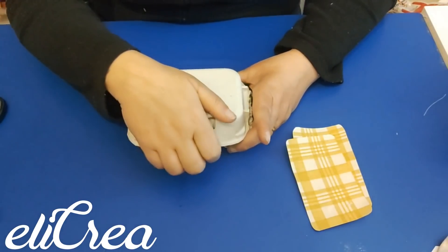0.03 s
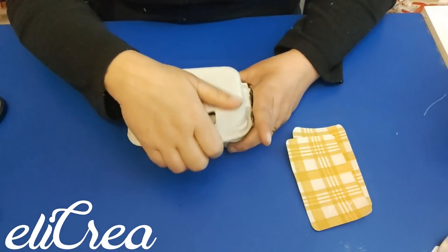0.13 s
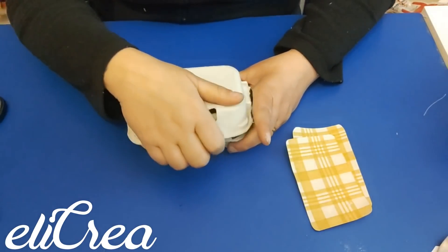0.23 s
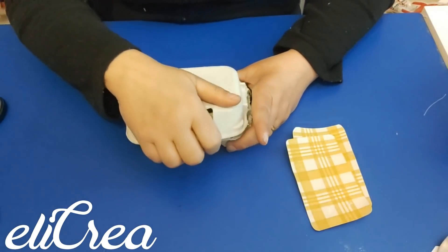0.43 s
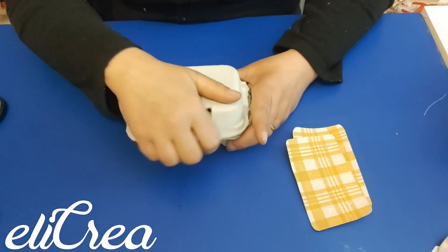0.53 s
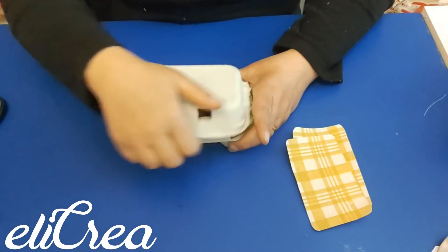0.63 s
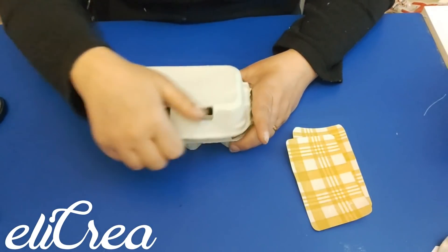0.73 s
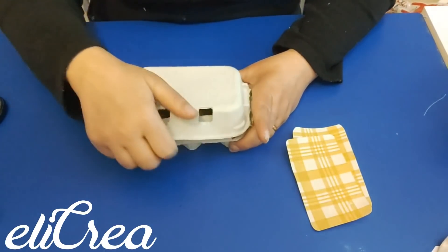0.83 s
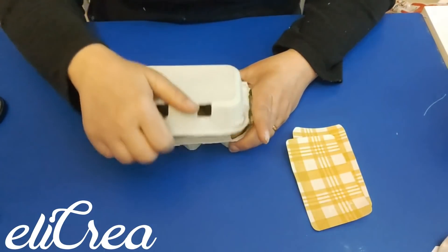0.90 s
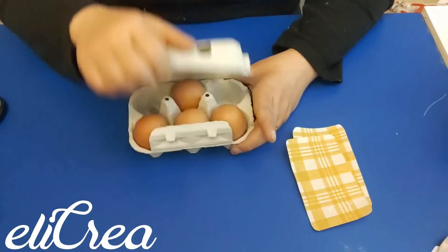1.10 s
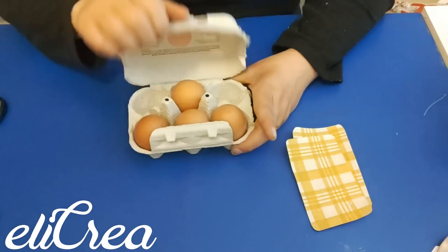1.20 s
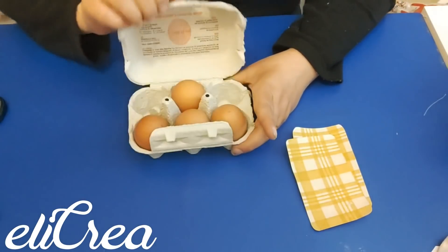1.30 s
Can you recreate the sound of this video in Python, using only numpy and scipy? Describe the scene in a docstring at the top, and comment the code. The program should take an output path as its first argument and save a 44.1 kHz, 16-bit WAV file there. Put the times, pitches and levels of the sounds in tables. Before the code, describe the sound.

An egg carton pops open with a hollow cardboard snap, a dry scrape and soft knocks

```python
"""Egg carton opening

A moulded cardboard egg carton is opened on a table in a small room. A thumb presses the lid and
a catch pops with a hollow snap, made of ringing shell modes; the lid scrapes over the catches, slips
free, and knocks softly as its hinge folds back. Clicks are short noise bursts; rasp and finger
rustle are grainy noise over a smooth rub, with a short room tail and a quiet floor of rumble and hiss."""
import sys
import numpy as np
from scipy import signal
from scipy.fft import rfft, irfft, next_fast_len
from scipy.io import wavfile
from scipy.ndimage import map_coordinates

SR = 44100
rng = np.random.default_rng(int(sys.argv[2]) if len(sys.argv) > 2 else 0)


def inscribe(sig):
    """Save sig as 16-bit PCM at rate SR to the path in sys.argv[1].

    A 1-D sig is mono; a 2-D sig holds one channel per row.
    Samples are clipped to [-1, 1] before scaling.
    """
    pcm = np.round(np.clip(np.atleast_2d(sig).T, -1, 1) * 32767)
    wavfile.write(sys.argv[1], SR, pcm.astype(np.int16))


N = 59535  # length in samples

# left-right likeness of the rubbing sounds: (frequency [Hz], correlation [-1 to 1])
RUB_LIKENESS = [(200, 0.87), (500, 0.66), (1200, 0.3), (3000, .2), (7000, 0.06)]


def amp(db):
    """Decibels to gain."""
    return 10 ** (np.asarray(db) / 20)


def unit(x):
    """Scale to rms 1."""
    return x / np.sqrt(np.mean(x ** 2) + 1e-20)


def along(points, hz):
    """Read a curve of (Hz, value) points on a log frequency axis."""
    point_hz, value = np.transpose(points)
    return np.interp(np.log(hz + 1), np.log(point_hz + 1), value)


def level(rows):
    """Gain per sample from (s, dB) rows, at -120 dB outside them."""
    s, db = np.transpose(rows)
    return amp(np.interp(np.arange(N) / SR, s, db, left=-120, right=-120))


def lasting(rows):
    """Gain per sample from (s, dB) rows, held at both ends."""
    return amp(np.interp(np.arange(N) / SR, *np.transpose(rows)))


def wobble(rate):
    """A smooth random curve with rate knots a second."""
    knots = rng.standard_normal(int(N * rate / SR) + 4)
    return map_coordinates(knots, [np.arange(N) * rate / SR])


def filtered(x, response):
    """Multiply the spectrum of x by a complex response of frequency."""
    size = next_fast_len(N + SR // 2)
    hz = np.fft.rfftfreq(size, 1 / SR)
    return irfft(rfft(x, size) * response(hz), size)[..., :N]


def coloured(x, colour, size=2048):
    """Minimum-phase filter of unit energy with the given spectrum, so attacks stay sharp."""
    cepstrum = irfft(np.log(amp(along(colour, np.fft.rfftfreq(size, 1 / SR)))))
    # folding the cepstrum forward makes the filter causal
    cepstrum[1:size // 2] *= 2
    cepstrum[size // 2 + 1:] = 0
    impulse = irfft(np.exp(rfft(cepstrum)))
    impulse /= np.linalg.norm(impulse)
    return signal.fftconvolve(x, impulse[None], axes=1)[:, :N]


def spread(pair, colour, alike):
    """Two unrelated signals become one coloured stereo sound of rms 1."""
    def mid_side_gain(hz):
        turn = np.arccos(np.clip(along(alike, hz), -1, 1)) / 2
        return amp(along(colour, hz)) * [np.cos(turn), np.sin(turn)]

    mid, side = filtered(pair, mid_side_gain)
    return unit(np.array([mid + side, mid - side]))


def add(track, s, sound):
    """Mix a sound into the track at s seconds."""
    i = round(s * SR)
    track[..., i:i + sound.shape[-1]] += sound[..., :N - i]


def knocks():
    """Each release rings the shell's modes near its contact pitch; opening the lid shifts their balance."""
    # resonances of the carton:
    # (frequency [Hz], level shut [dB], level open [dB], decay t60 [s])
    carton_modes = [(178, -12, -25, 0.15), (356.2, -4, -22, 0.11), (425.6, -13, 0, 0.079),
                    (443.7, -1, -6.5, 0.021), (519.4, -28.5, -16, .13), (750, -3.5, -46, 0.023),
                    (845.5, -11.5, -30, 0.05), (1000, -16, -33, 0.065), (1288, -54, -5.5, 0.075),
                    (1865, -25, -32, 0.024)]
    # shell knocks:
    # (time [s], level [dB], pitch the contact excites most [Hz], lid openness [0-1])
    knock_events = [(.2016, -6.5, 501, 0.04), (.4655, -38.5, 790, 0.12), (.5985, -34, 880, 0.1),
                    (.6673, -23.5, 950, 0), (.6696, -16, 770, 0.07), (.6782, -18, 578, 0.2),
                    (.7879, -45, 410, 0.8), (.8297, -37.5, 418, 1), (.8412, -41.5, 430, 1),
                    (0.9054, -31.5, 540, 1), (.9116, -27, 515, 0.5), (.9259, -28.5, 380, 0.93),
                    (.953, -41.5, 434, 0.9)]
    # reflections off near walls: (delay [s], gain [linear])
    wall_echoes = [(.0085, 0.19), (0.0228, .13), (.034, .06)]
    attack_s, scatter_db, left_lag_s = 0.001, 0.54, 0.00024
    focus_depth_db, contact_width_octaves = 15.5, 0.53
    bass_cut_db = 1  # per contact width below the contact's pitch
    radiation_hz = 310  # the shell radiates weakly below this

    out, t = np.zeros(N), np.arange(SR // 4) / SR
    hz, shut_db, open_db, t60 = np.transpose(carton_modes)[:, :, None]
    for s, db, contact_hz, opened in knock_events:
        widths = np.log2(hz / contact_hz) / contact_width_octaves
        focus_db = focus_depth_db * (np.exp(-widths ** 2) - 1) + bass_cut_db * np.minimum(widths, 0)
        mode_db = shut_db + opened * (open_db - shut_db) + focus_db
        mode_db = mode_db + scatter_db * rng.standard_normal(hz.shape)
        decay = np.exp(-np.log(1000) * t / t60)
        ring = amp(mode_db) * decay * np.sin(2 * np.pi * hz * t)
        attack = 1 - np.exp(-t / attack_s)
        add(out, s, -amp(db) * ring.sum(0) * attack)

    def path_to_ears(f):
        radiated = 1j * f / (radiation_hz + 1j * f)
        walls = 1 + sum(gain * np.exp(-2j * np.pi * f * delay) for delay, gain in wall_echoes)
        # half the lag delays the left, half advances the right
        lag = np.exp(-1j * np.pi * f * left_lag_s * np.array([[1], [-1]]))
        return radiated * walls * lag

    return filtered(out, path_to_ears)


def clicks():
    """Short bright cracks where an edge of the pulp lets go: decaying noise in a body and an air band."""
    # dry pulp clicks: (time [s], body level [dB], decay t60 [s], topmost treble relative to body [dB])
    click_events = [(0.198, -39, 0.017, -40), (0.2006, -23.5, 0.0081, -21), (0.351, -50, 0.011, -25),
                    (.363, -53, 0.012, -20), (.416, -56.5, 0.0064, -14), (0.4211, -46.5, 0.014, -23),
                    (.543, -45.5, 0.013, -32), (0.677, -53, 0.0033, -50), (0.928, -50.5, 0.021, -38)]
    # spectrum of the body: (frequency [Hz], level [dB])
    body_colour = [(300, 6.5), (1200, -1.5), (1550, -13), (2000, 1), (2500, -7.5), (3100, -7.5),
                   (4800, -12.5), (5500, 1), (6300, 6), (7500, -3), (8200, -23.5), (9200, -22.5),
                   (11000, -35.5)]
    # spectrum of the topmost treble: (frequency [Hz], level [dB])
    air_colour = [(4000, -46), (8300, 4), (10000, -1), (12500, -26), (16000, -13)]

    body, air, t = np.zeros((2, N)), np.zeros((2, N)), np.arange(SR // 20) / SR
    for s, db, t60, air_db in click_events:
        decay = np.exp(-np.log(1000) * t / t60)
        crack = amp(db) * decay * rng.choice([-1, 1], (2, len(t)))
        add(body, s, crack)
        add(air, s, amp(air_db) * crack)
    return coloured(body, body_colour) + coloured(air, air_colour)


def rubbing():
    """A bright rasp of pulp on pulp, a softer swish of fingers, and the hollow shell under both."""
    # thumb pressing the lid, before the rasp trim: (time [s], level [dB])
    press_stroke = [(.12, -73), (.165, -62), (.195, -53.5), (.215, -46.5), (.25, -57.5), (.29, -72)]
    # lid scraping over the catches, before the rasp trim: (time [s], level [dB])
    slide_stroke = [(.597, -62), (.617, -48.5), (.623, -39.5), (.642, -44), (.664, -36.5), (.687, -49),
                    (.735, -51), (.758, -47.5), (.772, -52), (.82, -52.5), (.86, -60), (.885, -95)]
    # hinge folding back, before the rasp trim: (time [s], level [dB])
    fold_stroke = [(.893, -81), (.906, -53), (.93, -54), (.947, -62.5), (.975, -65), (1.0, -83)]
    # fingers sliding on the lid: (time [s], level [dB])
    finger_level = [(0, -63), (.04, -63), (.08, -72.5), (.32, -76), (.45, -66.5), (.52, -70.5),
                    (1.0, -68.5), (1.03, -64.5), (1.06, -75), (1.1, -64.5), (1.23, -72.5), (1.27, -69.5),
                    (1.31, -73.5), (1.35, -65)]
    # spectrum of the finger swish: (frequency [Hz], level [dB])
    finger_colour = [(500, -16.5), (900, -12), (1300, -2.5), (2000, -17.5), (3200, -9.5), (4700, -8.5),
                     (6000, 0.5), (7500, -0.5), (8000, -14.5), (8400, -48)]
    # the shell's hollow answer to the rubbing: (time [s], level [dB])
    shell_level = [(0, -55), (.06, -64.5), (.13, -62.5), (.185, -57), (.2, -47.5), (.23, -45), (.29, -66.5),
                   (.36, -60), (.41, -69.5), (.47, -62), (.51, -68), (.594, -70), (.605, -53.5),
                   (.625, -49), (.66, -51), (.68, -41), (.73, -55), (.82, -56.5), (.885, -65), (.91, -46),
                   (.95, -59.5), (1.0, -66), (1.35, -78)]
    # spectrum of the hollow answer: (frequency [Hz], level [dB])
    shell_colour = [(60, -27.5), (130, -3), (220, -38.5), (295, -10.5), (350, 4), (385, -2.5), (432, 6),
                    (490, -6.5), (620, -3.5), (850, -6.5), (1100, -12.5), (1500, -20.5), (3000, -25.5),
                    (6000, -71)]
    rasp_trim_db = -2

    effort = amp(rasp_trim_db) * (level(press_stroke) + level(slide_stroke) + level(fold_stroke))
    fingers = lasting(finger_level) * spread(friction(), finger_colour, RUB_LIKENESS)
    shell = lasting(shell_level) * spread(friction(), shell_colour, RUB_LIKENESS)
    return effort * rasp() + fingers + shell


def rasp():
    """Friction with a bright resonance that shifts as the contact moves."""
    # spectrum of the rasp: (frequency [Hz], level [dB])
    rasp_colour = [(500, -12.5), (900, -11.5), (1500, -15.5), (2200, -18), (3000, -12), (4000, -13),
                   (4700, -15.5), (5300, -5.5), (6500, -6), (7550, -5), (7900, -22.5), (8150, -71)]
    # path of the resonance: (time [s], centre frequency [Hz])
    peak_path = [(.2, 6400), (.62, 6500), (.67, 6470), (.72, 6440), (.75, 7400), (.79, 7500), (.82, 5740),
                 (.87, 5900), (.905, 7500), (.93, 5800), (1.1, 6515)]
    peak_db, half_width_hz = 9.5, 250

    rub = spread(friction(), rasp_colour, RUB_LIKENESS)
    hz, t, spectrum = signal.stft(rub, SR, nperseg=256)
    offset = (hz[:, None] - np.interp(t, *np.transpose(peak_path))) / half_width_hz
    peak = amp(peak_db / (1 + offset ** 2))
    return unit(signal.istft(spectrum * peak, SR, nperseg=256)[1][:, :N])


def friction():
    """Fibres catching and slipping: dense uneven grains over a smooth rub, with a fast level judder."""
    grains_per_s, grain_spread_db = 3000, 2.5
    smooth_share = 0.51  # of the power
    judder_db, judder_knots_per_s = 1.16, 170

    slips = (rng.random(N) < grains_per_s / SR) * amp(grain_spread_db * rng.standard_normal(N))
    grains = unit(slips * rng.standard_normal((2, N)))
    smooth = rng.standard_normal((2, N))
    mix = np.sqrt(1 - smooth_share) * grains + np.sqrt(smooth_share) * smooth
    return mix * amp(judder_db * wobble(judder_knots_per_s))


def room(x):
    """A short diffuse tail of decaying noise, different at each ear and dying at its own rate per band."""
    # decay of the room: (frequency [Hz], decay t60 [s])
    room_decay = [(150, 0.33), (600, 0.067), (2000, 0.085), (7000, 0.11)]
    # colour of the room sound: (frequency [Hz], level [dB])
    send_colour = [(200, -6), (450, -12.5), (900, -0.5), (2000, 2), (7000, -0.5)]
    delay_s = .006

    hz, t, spectrum = signal.stft(rng.standard_normal((2, SR // 2)), SR, nperseg=256)
    decay = np.exp(-np.log(1000) * t / along(room_decay, hz)[:, None])
    tail = signal.istft(spectrum * decay, SR, nperseg=256)[1]
    tail = np.pad(tail / np.linalg.norm(tail[0]), ((0, 0), (round(delay_s * SR), 0)))
    wet = signal.fftconvolve(x, tail, axes=1)[:, :N]
    return filtered(wet, lambda f: amp(along(send_colour, f)))


def background():
    """Steady rumble and hiss of the quiet room, from coloured noise."""
    # spectrum of the floor: (frequency [Hz], level [dB])
    floor_colour = [(15, -31), (25, -2.5), (45, 2), (70, -2.5), (163, -8), (266, -13), (440, -15.5),
                    (700, -19), (1000, -23), (1500, -28), (3000, -30.5), (5000, -29), (7500, -28.5),
                    (8300, -48.5), (11000, -45.5), (15800, -44.5)]
    # left-right likeness of the floor: (frequency [Hz], correlation [-1 to 1])
    floor_likeness = [(30, 0.22), (125, 0.2), (400, 0.31), (1500, 0.13), (6000, 0.036)]
    floor_db = -57.5  # rms
    return amp(floor_db) * spread(rng.standard_normal((2, N)), floor_colour, floor_likeness)


def scene():
    """The carton in its room, each band leaning to one side, over the background."""
    # stereo lean of the carton and its room: (frequency [Hz], left minus right [dB])
    lean_curve = [(60, 5), (160, 3.5), (360, 3), (560, 1), (900, -2.5), (1800, -9.5), (3000, -3.5),
                  (5200, 1), (6500, 7), (7600, -7), (8600, 6), (12000, 3)]
    room_db = -11.5

    carton = knocks() + clicks() + rubbing()
    heard = carton + amp(room_db) * room(carton)
    halves = np.array([[.5], [-.5]])  # left up, right down by half the lean each
    leaning = filtered(heard, lambda hz: amp(along(lean_curve, hz) * halves))
    return leaning + background()


def record(dry):
    """A steep low-pass keeps nothing above the band limit."""
    top_hz = 15900
    return filtered(dry, lambda hz: hz < top_hz)


dry = scene()
out = record(dry)
inscribe(out)
```